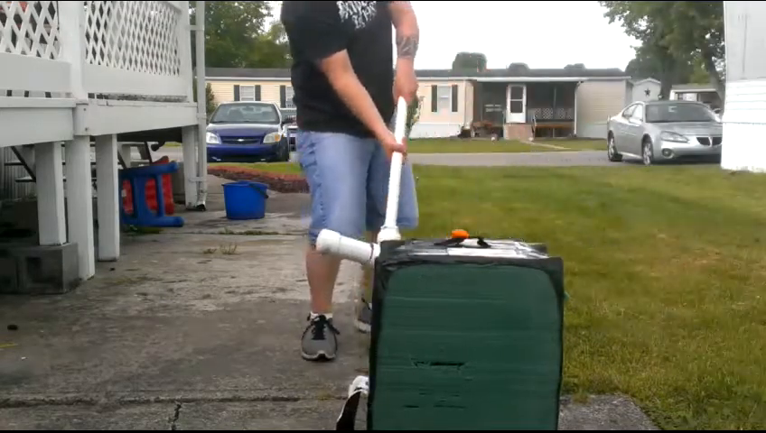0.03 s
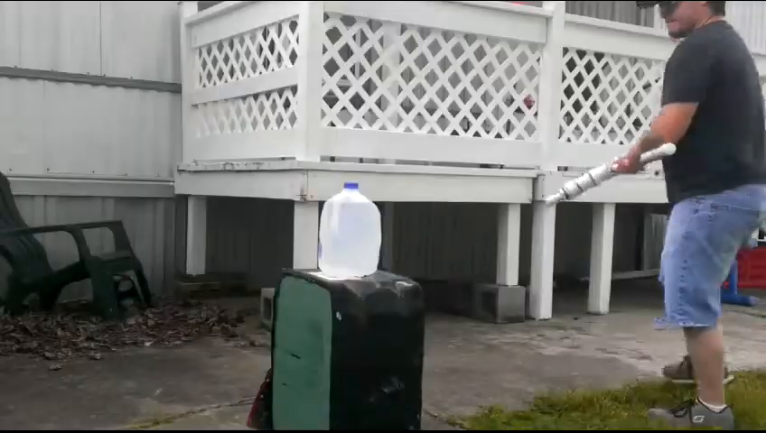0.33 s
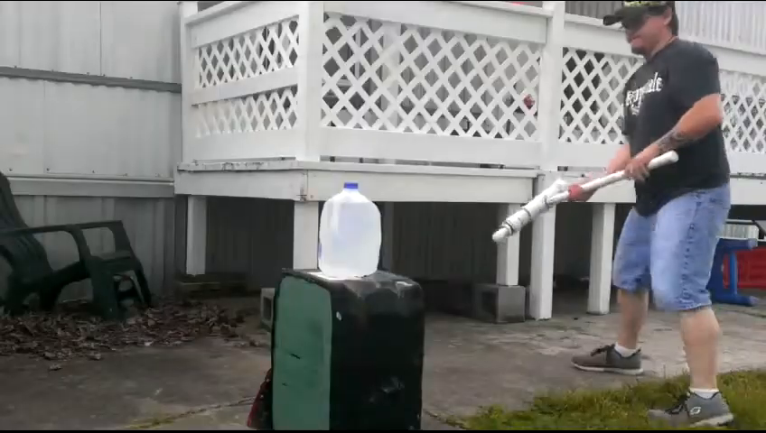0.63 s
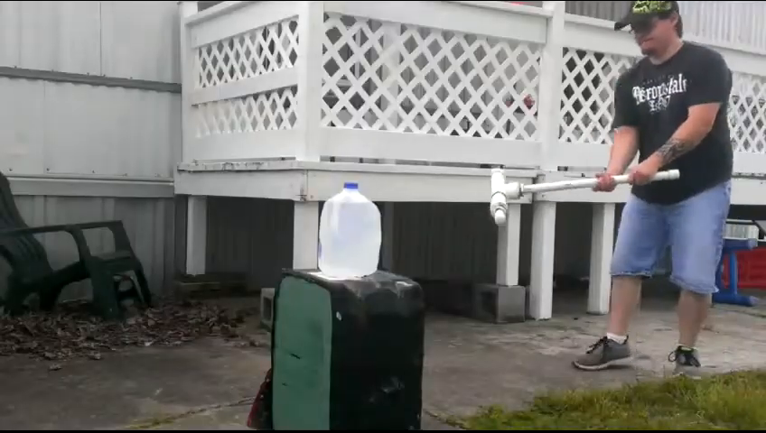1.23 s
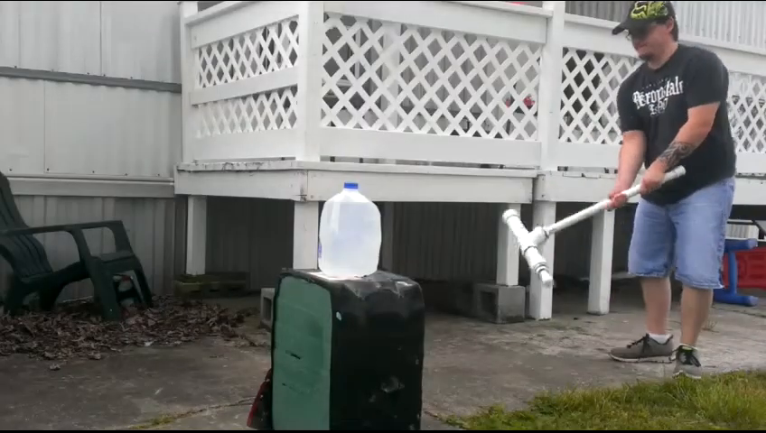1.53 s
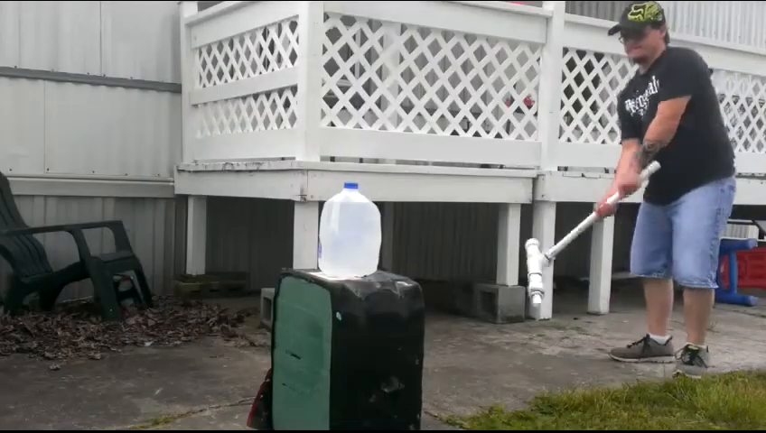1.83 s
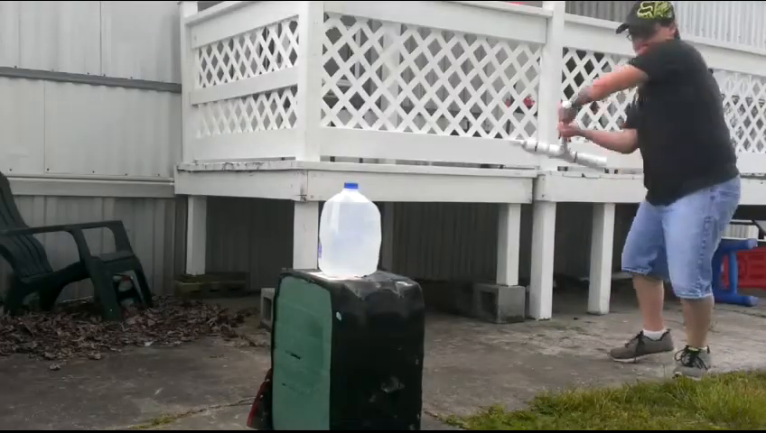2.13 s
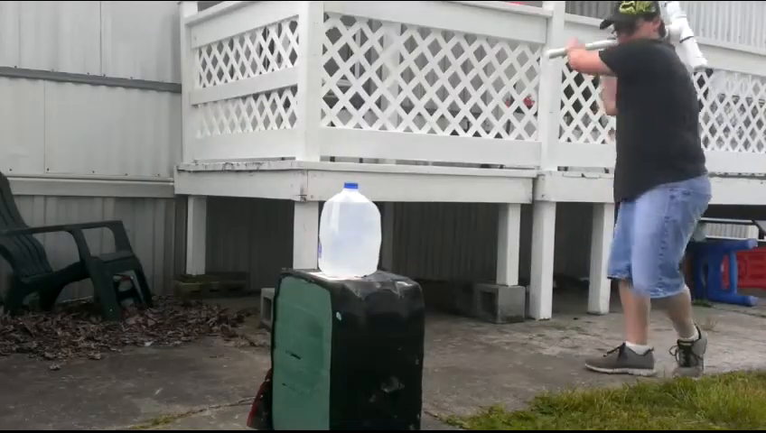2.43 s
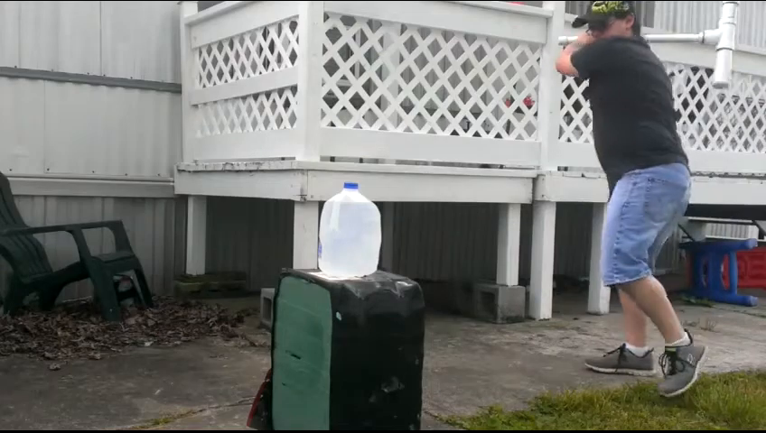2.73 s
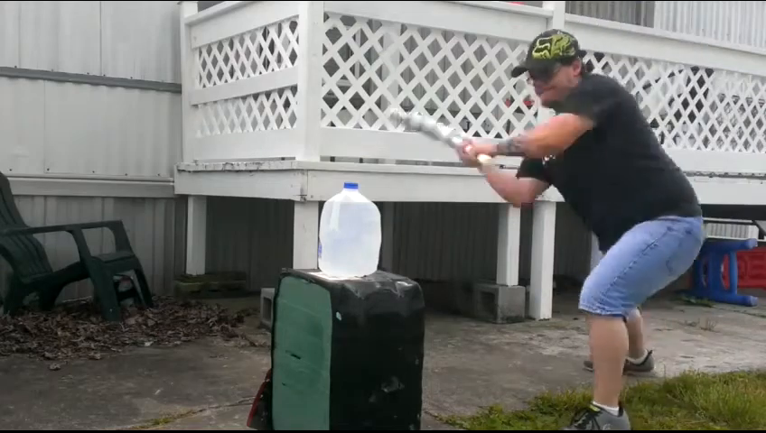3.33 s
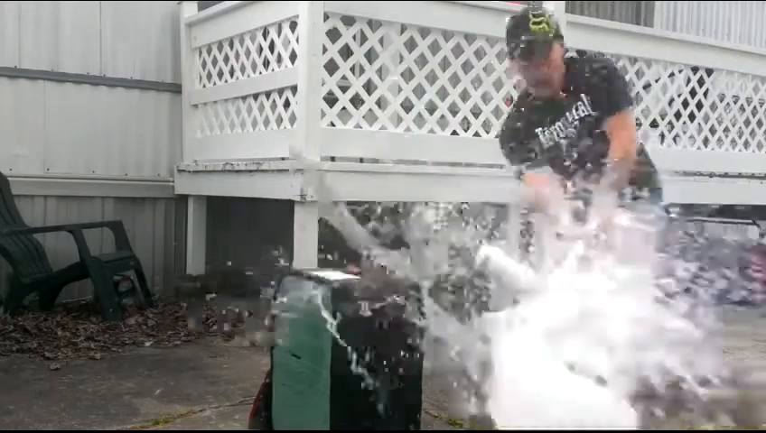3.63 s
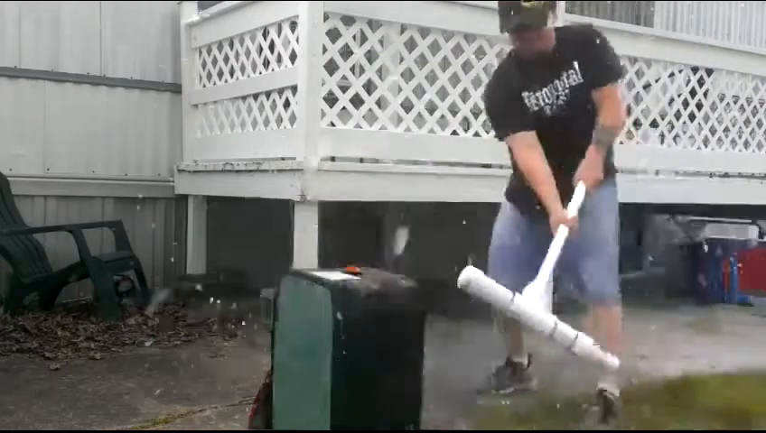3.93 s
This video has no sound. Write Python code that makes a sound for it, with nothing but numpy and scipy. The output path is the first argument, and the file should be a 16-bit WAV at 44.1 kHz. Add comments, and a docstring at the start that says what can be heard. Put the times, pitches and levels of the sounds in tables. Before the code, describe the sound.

A plastic water jug is smashed in a quiet yard. For the first three seconds, wind buffets the microphone over faint birdsong, light shoe scuffs and soft clothing swishes. At about 3.3 seconds a plastic hammer bursts the jug with a loud crack, hollow thump and spray. At 3.6 seconds the water slaps onto concrete, pours down and thins to a patter around 4 seconds, with quick echoes.

```python
"""In a quiet yard, wind buffets the microphone and birds sing over a faint hush.
Shoes scuff and clothes swish as someone swings a plastic-pipe hammer at a full water jug.
The jug cracks, thumps and sprays. A third of a second later the water slaps on the concrete,
pours down and thins to a patter. The ground, deck and house wall throw back quick echoes."""
import sys
import numpy as np
from scipy import signal
from scipy.fft import rfft, irfft
from scipy.io import wavfile

SR = 44100
rng = np.random.default_rng(int(sys.argv[2]) if len(sys.argv) > 2 else 0)


def digitize_waveform(pressure):
    """Quantize a signal to 16-bit integers and store it at the path in sys.argv[1].

    Rows of a 2-D input are taken as channels; values are limited to [-1, 1].
    """
    field = np.atleast_2d(pressure).T
    bounded = np.clip(field, -1, 1)
    quanta = np.round(bounded * 32767).astype(np.int16)
    wavfile.write(sys.argv[1], SR, quanta)


N = 176400
T = np.arange(N) / SR
FREQS = np.fft.rfftfreq(N, 1 / SR)
TREBLE_LIMIT_HZ = 10520


def amp(db):
    """Turns decibels into a number to multiply by."""
    return 10 ** (np.asarray(db) / 20)


def unit(x):
    """Scales a signal to an average power of one."""
    return x / np.sqrt(np.mean(x ** 2) + 1e-20)


def value_at(points, hz):
    """Looks up a (frequency, value) table, joining its points on a musical scale."""
    freqs, values = np.transpose(points)
    return np.interp(np.log(hz + 1), np.log(freqs + 1), values)


def add(mix, start, sound):
    """Adds a sound to the mix at a start time in seconds."""
    part = mix[..., round(start * SR):][..., :sound.shape[-1]]
    part += sound[..., :part.shape[-1]]


def colour(x, tone, size=4096):
    """Makes some frequencies stronger and others weaker, following a tone table."""
    hz = abs(np.fft.fftfreq(size, 1 / SR))
    gain_db = value_at(tone, hz) - 40 * (hz > TREBLE_LIMIT_HZ + 1000)
    log_gain = np.log(amp(np.maximum(gain_db, -100)))
    # this filter rings only after a click, never before it
    taps = np.fft.ifft(np.exp(np.conj(signal.hilbert(log_gain)))).real[:size // 2]
    return signal.oaconvolve(x, taps[None] / np.linalg.norm(taps), axes=1)[:, :N]


def stereo(pair, likeness):
    """Blends two unrelated signals into a left and a right that are partly alike."""
    same = np.clip(value_at(likeness, FREQS), -1, 1)
    mid, side = rfft(pair) * np.sqrt([(1 + same) / 2, (1 - same) / 2])
    return irfft(np.array([mid + side, mid - side]), N)


def wander(per_s):
    """A smooth random wobble, up to about per_s swings a second."""
    return unit(irfft(rfft(rng.standard_normal(N)) * np.exp(-(FREQS / per_s) ** 2), N))


def envelope(start, rise, hold, fade, db):
    """Loudness that rises, holds and fades. A fade is always the time taken to drop 60 dB."""
    fading_s = np.maximum(T - start - rise - hold, 0)
    return np.clip((T - start) / rise, 0, 1) * amp(db - 60 * fading_s / fade)


# how alike left and right sound (frequency [Hz], likeness [0-1])
EAR_LIKENESS = [(60, .95), (400, .97), (900, .92), (2000, .72), (4500, .5), (10400, .45)]
def grains(tone, shapes, per_s, uneven_db, clump_db=1.5):
    """A swarm of tiny hits, like drops or grit, that swells and fades with each shape."""
    sizes = amp(uneven_db * np.minimum(rng.exponential(1, (2, N)), 4)) * rng.choice([-1, 1], (2, N))
    hits = rng.random((2, N)) < per_s / SR
    clicks = unit(sizes * hits * amp(clump_db * wander(130)))
    loudness = sum(envelope(*shape) for shape in shapes)
    return colour(stereo(clicks, EAR_LIKENESS) * loudness, tone)


def reverb(x, fade, delay_s=.012):
    """Many faint outdoor echoes that blur together, different in each ear."""
    t = T[:SR]
    echoes = rng.standard_normal((2, SR)) * (rng.random((2, SR)) < 2000 / SR)
    echoes *= (t > delay_s) * amp(-60 * t / fade)
    return signal.fftconvolve(np.atleast_2d(x), echoes / np.linalg.norm(echoes[0]), axes=1)[:, :N]


def pushes(rows, sag, rise_s):
    """Short, low swings of air pressure whose pitch sinks by the fraction sag."""
    out, t = np.zeros(N), T[:SR // 4]
    for start, db, hz, fade in rows:
        cycles = np.cumsum(hz * (1 - sag * np.minimum(t / fade, 1))) / SR
        onset = 1 - np.exp(-(t / rise_s) ** 2)
        add(out, start, -amp(db - 60 * t / fade) * np.sin(2 * np.pi * cycles) * onset)
    return out


# tone of the hush (frequency [Hz], level [dB])
HUSH_TONE = [(25, -14), (60, -1), (200, -3), (313, -7), (700, -9), (1100, -15), (1750, -22), (2500, -20),
             (3300, -24), (4600, -28), (7000, -24), (10400, -25)]
# moments when the hush turns duller (start [s], end [s])
TREBLE_DIPS = [(.6, .79), (1.51, 1.56), (1.92, 2.09), (2.25, 2.3), (2.6, 2.81)]
def hush(level_db=-53, dip_db=-16, dip_above_hz=1300, slope_s=.04):
    """The faint hush of the neighbourhood; its treble dips now and then."""
    noise = colour(stereo(rng.standard_normal((2, N)), EAR_LIKENESS), HUSH_TONE)
    noise *= amp(level_db + wander(5))
    low = irfft(rfft(noise) / (1 + (FREQS / dip_above_hz) ** 4), N)
    dip = sum(np.clip(np.minimum(T - start, end - T) / slope_s + .5, 0, 1) for start, end in TREBLE_DIPS)
    return low + (noise - low) * amp(dip_db * dip)


# strength of the wind (time [s], level [dB])
GUSTS = [(.2, -55), (.27, -34), (.35, -48), (.412, -56), (.435, -25), (.7, -22), (.85, -27), (1.11, -31),
         (1.22, -43), (1.42, -42), (1.47, -30), (1.55, -26), (1.68, -31), (1.87, -23), (2.0, -21),
         (2.22, -32), (2.28, -25), (2.75, -26), (2.8, -52), (2.86, -55), (2.9, -37), (3.0, -49),
         (3.06, -36), (3.13, -50), (4.0, -54)]
# tone of its rumble (frequency [Hz], level [dB])
WIND_TONE = [(10, -60), (25, -29), (40, -12), (55, -1), (75, 2), (110, -1), (168, -7), (220, -13),
             (400, -29), (500, -37), (800, -44), (1300, -53), (2500, -80)]
# sudden puffs on the microphone (time [s], level [dB], pitch [Hz], fade [s])
PUFFS = [(.612, -21, 300, .03), (.63, -11, 300, .018), (.686, -17, 220, .04), (.765, -21, 310, .04),
         (.975, -24, 190, .03), (1.541, -21, 200, .035), (1.893, -21, 300, .045), (2.095, -19, 170, .03),
         (2.2595, -14, 150, .03), (2.41, -18, 170, .03), (2.583, -15, 180, .03)]
def wind(likeness=.5, lumps_db=2.5, left_db=.6):
    """Swirling air hits the microphone, making a lumpy rumble and a few sharper bumps."""
    swirls = stereo(rng.standard_normal((2, N)), [(100, likeness)])
    swirls *= unit(amp(lumps_db * wander(28)))
    strength = amp(np.interp(T, *np.transpose(GUSTS)))
    rumble = colour(swirls * strength, WIND_TONE)
    return (rumble + pushes(PUFFS, sag=.3, rise_s=.002)) * amp([[left_db], [-left_db]])


# the song (start [s], length [s], first pitch [Hz], middle pitch [Hz], last pitch [Hz], level [dB])
SONG_NOTES = [(.5, .055, 2200, 2380, 2600, -57), (.555, .04, 2400, 3000, 3400, -59),
              (.65, .06, 2100, 2280, 2450, -56), (.715, .07, 2200, 2330, 2200, -56),
              (1.07, .075, 2990, 2940, 2670, -41), (1.148, .042, 2300, 2370, 2450, -50),
              (1.21, .08, 3020, 2950, 2720, -43), (1.29, .055, 2420, 2470, 2500, -48),
              (1.648, .048, 2800, 3380, 2720, -45), (1.685, .05, 2950, 2540, 2790, -44),
              (1.724, .045, 2700, 2890, 2600, -43), (1.79, .05, 2600, 2790, 2780, -51),
              (2.123, .035, 3600, 3250, 2600, -47), (2.148, .115, 2620, 2370, 2340, -43),
              (2.25, .05, 2350, 2200, 2100, -49), (2.305, .045, 2130, 2280, 2320, -40), ]
def songbird(waver=.016, flutter_db=3):
    """A bird slides each pure note through three pitches, with a slight tremble."""
    out, drift = np.zeros(N), 1 + waver * wander(120)
    for start, length, first, middle, last, db in SONG_NOTES:
        progress = np.arange(0, length, 1 / SR) / length
        slide = np.polyval(np.polyfit([0, .5, 1], [first, middle, last], 2), progress)
        hz = slide * drift[round(start * SR):][:len(progress)]
        swell = np.sqrt(2 * abs(np.sin(np.pi * progress)))
        add(out, start, amp(db) * swell * np.sin(2 * np.pi * np.cumsum(hz) / SR))
    return out * unit(amp(flutter_db * wander(110)))


# a second bird's calls (start [s], length [s], pitch [Hz], level [dB])
WHISTLES = [(1.7, .18, 7110, -54), (2.86, .11, 3695, -61)]
def whistling_bird():
    """Another bird gives thin whistles, each on one steady pitch."""
    out = np.zeros(N)
    for start, length, hz, db in WHISTLES:
        t = np.arange(0, length, 1 / SR)
        swell = np.sqrt(abs(np.sin(np.pi * t / length)))
        add(out, start, amp(db) * swell * np.sin(2 * np.pi * hz * t))
    return out


def birds():
    """Both birds, blurred by echoes from trees and houses."""
    song = songbird() + whistling_bird()
    return song + amp(-3) * reverb(song, fade=.25) + amp(-8) * reverb(song, fade=.75, delay_s=.03)


# movements before the blow (start [s], rise [s], hold [s], fade [s], level [dB])
SCUFFS = [(.482, .003, .005, .06, -57), (.822, .008, .016, .13, -39), (.97, .02, .03, .2, -52)]
SQUEAKS = [(.481, .002, .004, .05, -52), (.827, .008, .005, .05, -41), (.995, .01, .015, .1, -60)]
SWISHES = [(.75, .06, .06, .5, -55), (1.56, .04, .04, .35, -51), (2.1, .02, .04, .45, -50),
           (2.31, .13, .03, .22, -45.5), (3.03, .04, .03, .15, -52), (3.15, .015, .015, .2, -48)]
# their tones (frequency [Hz], level [dB])
SCUFF_TONE = [(300, -12), (600, -10), (900, -1), (1200, -10), (1520, 4), (1900, -9), (2900, -4),
              (4500, -12), (8000, -7), (10400, -12)]
SQUEAK_TONE = [(700, -30), (920, -12), (1200, -24), (1440, -10), (1520, 0), (1620, -10), (2000, -30),
               (5000, -50)]
SWISH_TONE = [(300, -4), (900, 1), (2000, -2), (4200, -5), (6300, 0), (8500, -2), (10400, -6)]
def hammer_swing():
    """Shoes scuff, rubber soles squeak, and the clothes and hammer swish."""
    scuffs = grains(SCUFF_TONE, SCUFFS, per_s=3000, uneven_db=4)
    squeaks = grains(SQUEAK_TONE, SQUEAKS, per_s=2000, uneven_db=1.5)
    return scuffs + squeaks + grains(SWISH_TONE, SWISHES, per_s=14000, uneven_db=3)


def bubbles(start, per_s=110, low_hz=350, high_hz=3500, ring_cycles=7, glide=.15):
    """Air trapped in the puddle rings in short, rising blips; later ones are quieter."""
    out, t = np.zeros((2, N)), T[:SR // 12]
    length = T[-1] - start
    for when, pitch, size, side in rng.random((200, 4))[:int(per_s * length)]:
        hz = low_hz * (high_hz / low_hz) ** pitch
        age = t * hz / ring_cycles
        rising_hz = hz * (1 + glide * np.minimum(age, 2))
        ring = np.exp(-age) * np.sin(2 * np.pi * np.cumsum(rising_hz) / SR)
        pan = np.sqrt([[1 - side], [side]])
        add(out, start + when * length, amp(-38 + 10 * size - 10 * when) * pan * ring)
    return out


# single sharp clicks (time [s], level [dB], pitch [Hz], time to fall to about a third [s])
TICKS = [(3.165, -28, 8000, .003), (3.3132, -9, 8500, .0008), (3.3375, -20, 8000, .0007),
         (3.748, -19, 2300, .0012), (3.781, -24, 3500, .001), (3.9175, -18, 8500, .0008),
         (3.9388, -20, 8000, .0006)]
def ticks(width_octaves=.7):
    """Plastic and large drops click, each a tiny burst of bright noise."""
    out, t = np.zeros((2, N)), T[:2048]
    freqs = np.fft.rfftfreq(len(t), 1 / SR) + 1
    for start, db, hz, decay in TICKS:
        band = np.exp(-(np.log2(freqs / hz) / width_octaves) ** 2 / 2)
        noise = irfft(rfft(rng.standard_normal((2, len(t)))) * band)
        add(out, start, amp(db) * unit(noise) * np.exp(-t / decay))
    return out


# stages of the splash (start [s], rise [s], hold [s], fade [s], level [dB])
FLIGHT = (3.46, .05, .09, .3, -40.5)
FIRST_DROPS = (3.598, .016, .02, .1, -31)
SLAP = (3.6195, .01, .013, .075, -14.5)
POUR = (3.63, .03, .06, .46, -26.3)
FIZZ = (3.645, .05, .08, .55, -32)
DRUMMING = (3.735, .012, .055, .11, -30.5)
PATTER = (3.68, .08, .2, 1.5, -38.5)
LAST_SPLASH = (3.945, .04, .03, .4, -31)
# their tones (frequency [Hz], level [dB])
FLIGHT_TONE = [(59, -59), (100, -29), (169, 0), (244, -14), (405, -2), (532, -9), (916, -4), (1520, -10),
               (10400, -16), (13500, -46), (22000, -120)]
SLAP_TONE = [(35, -54), (60, -26), (150, -10), (350, 0), (590, -8), (900, -4), (1060, -11), (1200, -7),
             (1660, -17), (2250, -20), (3100, -16), (4600, -17), (6200, -21), (7500, -28), (10400, -32)]
POUR_TONE = [(59, -45), (100, -15), (275, -5), (375, 1), (621, -9), (991, -6), (1330, -13), (1430, -19),
             (2330, -18), (3570, -13), (5070, -20), (6520, -14), (10400, -22), (13500, -52), (22000, -120)]
FIZZ_TONE = [(1000, -25), (2000, -9), (2900, 0), (4700, -5), (6500, 2), (8000, -2), (10400, -4)]
DRUM_TONE = [(200, -35), (450, -14), (620, 0), (980, -3), (1400, -25), (3000, -22), (5000, -40)]
PATTER_TONE = [(60, -18), (145, -16), (250, -7), (350, -3), (470, -13), (930, -9), (1810, -20), (2670, -11),
               (4510, -16), (6780, -10), (10400, -20)]
def falling_water():
    """Drops fly, most of the water slaps down, then it pours, fizzes, drums and patters out."""
    out = grains(FLIGHT_TONE, [FLIGHT, FIRST_DROPS], per_s=9000, uneven_db=4.5)
    out += grains(SLAP_TONE, [SLAP], per_s=5000, uneven_db=3.5)
    out += grains(POUR_TONE, [POUR], per_s=9000, uneven_db=4.5)
    out += grains(FIZZ_TONE, [FIZZ], per_s=6000, uneven_db=4)
    out += grains(DRUM_TONE, [DRUMMING], per_s=1200, uneven_db=3) * amp([[-3], [2]])  # to the right
    return out + grains(PATTER_TONE, [PATTER, LAST_SPLASH], per_s=5000, uneven_db=4.5)


# low thumps (time [s], level [dB], pitch [Hz], fade [s])
THUMPS = [(3.264, -11, 230, .06), (3.2815, -9, 220, .07), (3.318, -3, 160, .04), (3.6225, -13, 270, .04),
          (3.635, -10, 400, .05), (3.886, -29, 370, .06), (3.951, -26, 350, .08)]
def thumps():
    """The jug thumps as it caves in, and so does the water as it lands."""
    return pushes(THUMPS, sag=.25, rise_s=.001)


# the blow and the quick cracks as the jug splits (time [s], level [dB])
CRACKS = [(3.2636, -5), (3.2675, -6), (3.2700, -7), (3.2817, -6), (3.2885, -6), (3.2922, -8), (3.2985, -11),
          (3.312, -12)]
# hollow ringing pitches heard after each crack (pitch [Hz], level [dB], fade [s])
RING_NOTES = [(168, -17, .3), (205, -19, .35), (400, -19, .15), (481, -11, .17), (601, -13, .14),
              (721, -11, .14), (778, -13, .14), (914, -15, .13), (990, -15, .14), (1460, -16, .12),
              (1930, -22, .08), (2760, -19, .09)]
# water leaving the jug (start [s], rise [s], hold [s], fade [s], level [dB])
BURST = (3.2622, .001, .028, .185, -10.8)
SPRAY = (3.263, .004, .14, .32, -25)
# its tones (frequency [Hz], level [dB])
BURST_TONE = [(30, -45), (60, -18), (110, -8), (190, 1), (300, -3), (500, -2), (800, -1), (1150, -8),
              (1480, -5), (2100, -14), (2800, -12), (4700, -19), (6300, -16), (7600, -23), (10400, -26)]
SPRAY_TONE = [(60, -20), (110, -3), (200, -1), (320, -9), (630, -7), (1200, -8), (2000, -13), (2850, -9),
              (4700, -15), (6700, -13), (10400, -21)]
def bursting_jug(snap_s=.0012, snap_db=-7, ring_db=-7.5):
    """Each crack is a snap with a hollow ring after it; water is forced out with a roar and a hiss."""
    out, t = np.zeros((2, N)), T[:SR // 3]
    for start, db in CRACKS:
        ring = sum(amp(level - 60 * t / fade) * np.sin(2 * np.pi * (hz * t + rng.random()))
                   for hz, level, fade in RING_NOTES)
        snap = rng.standard_normal((2, len(t))) * np.exp(-t / snap_s)
        add(out, start, amp(db) * (amp(ring_db) * ring + amp(snap_db) * snap))
    out += grains(BURST_TONE, [BURST], per_s=7000, uneven_db=3)
    return out + grains(SPRAY_TONE, [SPRAY], per_s=12000, uneven_db=4)


# echoes off the ground, deck and wall (delay [s], level [dB])
ECHOES = [(.0083, -12), (.0175, -14), (.029, -15)]
def scene():
    """The nearby sounds bounce around the yard, with birds, wind and hush behind them."""
    near = bursting_jug() + thumps() + falling_water() + bubbles(start=SLAP[0])
    near += ticks() + hammer_swing()
    out = near + amp(-15) * reverb(near, fade=.3)
    for delay, db in ECHOES:
        add(out, delay, amp(db) * near)
    return out + birds() + wind() + hush()


# how much louder the left is than the right (frequency [Hz], level [dB])
LEFT_LEAN = [(100, 0), (800, -.5), (1500, 2.5), (2900, 1.5), (5500, -1), (7000, 2), (8500, 7), (10400, 6)]
def record(dry, ceiling=.8, silent_s=.21):
    """After a short silence, the microphone leans the treble left, rounds peaks and cuts the top."""
    lean_db = value_at(LEFT_LEAN, FREQS) / 2
    leaning = irfft(rfft(dry) * amp([lean_db, -lean_db]), N)
    fade_in = np.clip((T - silent_s) / .015, 0, 1)
    rounded = ceiling * np.tanh(leaning * fade_in / ceiling)
    treble_cut = signal.firwin(701, TREBLE_LIMIT_HZ, window=("kaiser", 8), fs=SR)
    return signal.oaconvolve(rounded, treble_cut[None], "same")


dry = scene()
out = record(dry)
digitize_waveform(out)
```